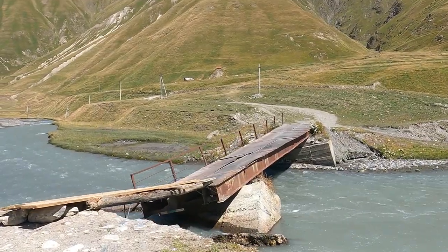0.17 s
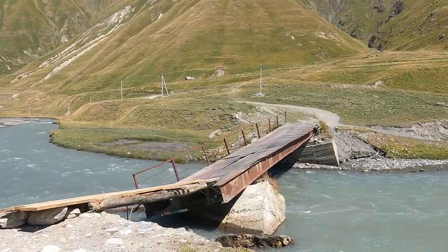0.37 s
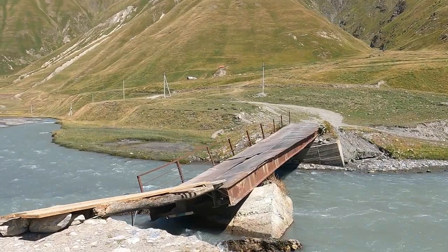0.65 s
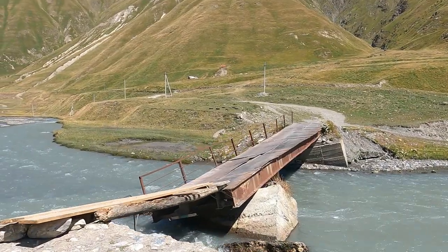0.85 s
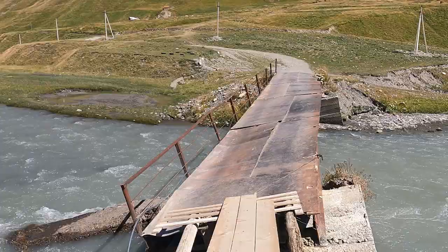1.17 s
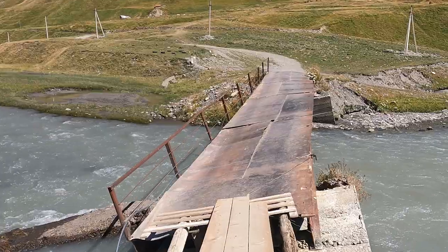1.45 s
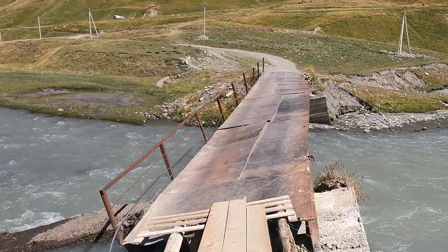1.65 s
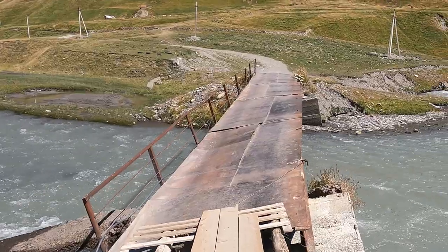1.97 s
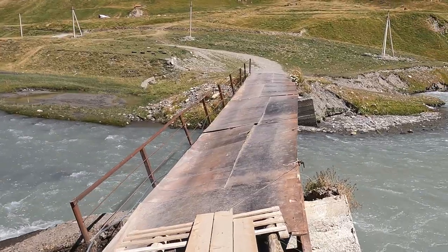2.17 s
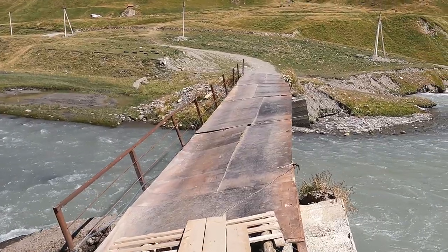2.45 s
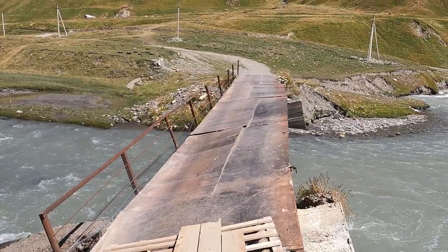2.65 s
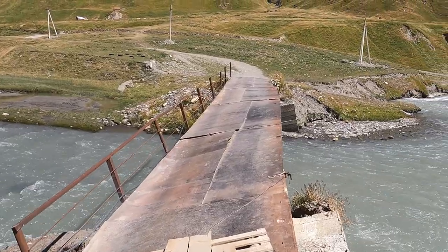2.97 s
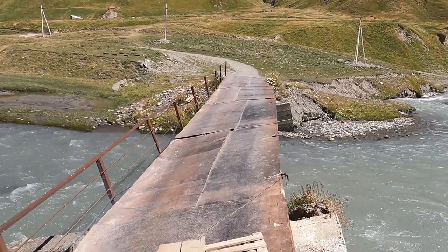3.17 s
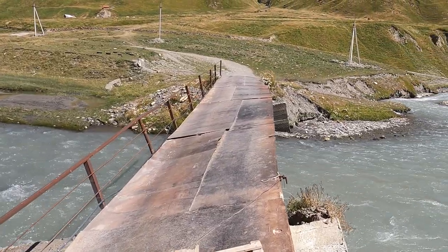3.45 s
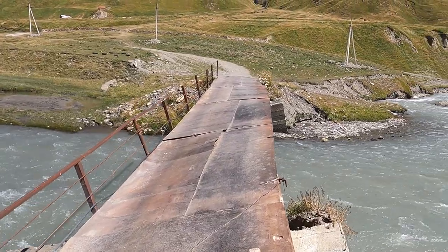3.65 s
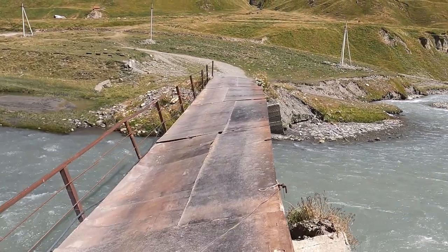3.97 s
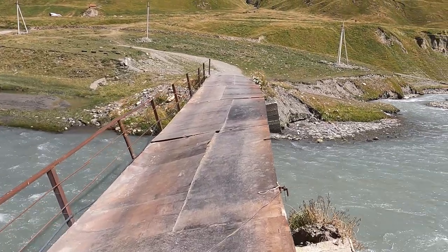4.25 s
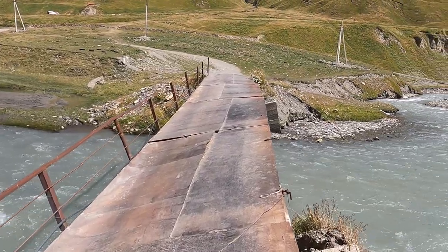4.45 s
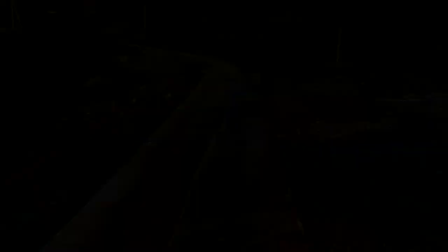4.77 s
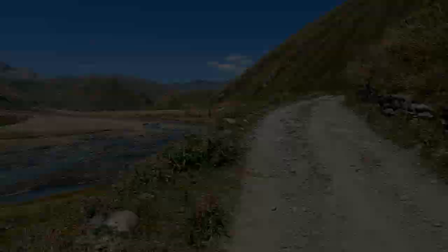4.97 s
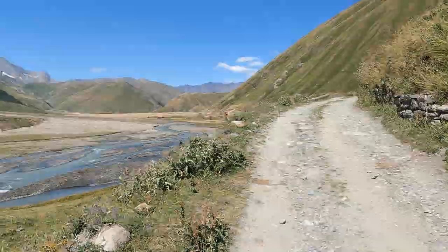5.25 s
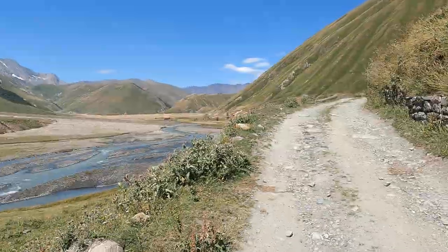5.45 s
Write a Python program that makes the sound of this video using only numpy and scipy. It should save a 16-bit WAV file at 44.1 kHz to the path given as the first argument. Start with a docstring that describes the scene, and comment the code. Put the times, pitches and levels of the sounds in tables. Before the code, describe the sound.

A mountain river rushes and gurgles, heard from the bank while wind rumbles on the microphone. After about a second it turns abruptly louder and fuller, heard from a bridge right above the water. Shoes lightly scuff grit over the steel deck, which gives one tiny squeak. The sound fades out, then returns much quieter, with a single footstep on gravel, a light breeze and the river far away.

```python
"""Mountain river: first from the bank, then, after a hard cut, from a bridge right above it.
The water is merged splashes and ringing air bubbles; at the bridge also deep roar and spray.
Wind buffets the microphone. Shoes scuff grit over the steel deck, which squeaks once.
Fade out, then fade in on a gravel road: one footstep, a light breeze, the river far away."""
import sys
import numpy as np
from scipy import signal
from scipy.fft import rfft, irfft
from scipy.io import wavfile
from scipy.ndimage import uniform_filter1d

SR = 44100
rng = np.random.default_rng(int(sys.argv[2]) if len(sys.argv) > 2 else 0)


def unload_wav(signal):
    """Save mono or channel-first audio to the path in sys.argv[1] as 16-bit WAV at rate SR, clipped to [-1, 1]."""
    wavfile.write(
        sys.argv[1],
        SR,
        np.round(np.clip(np.atleast_2d(signal).T, -1, 1) * 32767).astype(np.int16),
    )


N = 246959
TIME_S = np.arange(N) / SR
BINS_HZ = np.fft.rfftfreq(N, 1 / SR)

CUT_S = 1.205  # bank to bridge
FADE_OUT_START_S, FADE_OUT_DB_PER_S = 4.535, 175
FADE_IN_END_S, FADE_IN_DB_PER_S = 5.284, 180

# water spectra: f/Hz, level/dB
BANK_SPECTRUM = [(190, -24), (330, -3), (478, -6), (671, 0.5), (838, -4.5), (1290, -5), (1450, -7),
                 (2470, -11.5), (3030, -21.5), (3790, -18.5), (4260, -18), (6260, -39), (8170, -48),
                 (9760, -45.5), (11300, -53), (14700, -82), (22000, -120)]
BRIDGE_SPECTRUM = [(240, -27), (400, -2), (514, -4.5), (816, -0.5), (2270, -8.5), (2500, -10),
                   (2950, -20.5), (3350, -14.5), (3910, -16), (4430, -21), (6930, -33), (8550, -42.5),
                   (9700, -42.5), (11300, -50.5), (14700, -85), (22000, -120)]
FAR_SPECTRUM = [(100, -16), (180, -6.5), (310, 0), (440, -7), (600, -3), (900, -7), (1100, -3.5),
                (1450, -7.5), (1850, -7), (2500, -12.5), (3050, -25), (3900, -22.5), (6200, -35.5),
                (11500, -48), (15000, -77)]
ROAR_SPECTRUM = [(40, -16.5), (130, -8), (260, 2.5), (350, -0.5), (450, -9.5), (700, -41), (2000, -87)]
SPRAY_SPECTRUM = [(9000, -41.5), (12000, -12), (12700, 2.5), (14200, -1), (15000, -20)]
# water at the bridge, overall and white-water treble: t/s, gain/dB
BRIDGE_GAIN = [(1.2, -28), (2.15, -25.5), (3.25, -26.5), (4.0, -26.1), (4.5, -25)]
FOAM_GAIN = [(1.2, -1.5), (1.75, 2.5), (2.2, -1), (2.9, 2), (3.5, 0), (4.1, 3), (4.55, -.5)]

# wind spectra: f/Hz, level/dB
BANK_WIND_SPECTRUM = [(8, -9), (25, 0), (60, 3), (120, -1.5), (185, -7), (300, -16.5), (500, -35.5),
                      (1200, -46), (5000, -88)]
BRIDGE_WIND_SPECTRUM = [(8, -10), (25, 0), (60, 0), (120, -1.5), (180, -10.5), (300, -15), (500, -20.5),
                        (1200, -42), (5000, -85)]
ROAD_WIND_SPECTRUM = [(8, -10), (35, 1), (80, -4), (150, -17), (400, -35), (3000, -90)]
EDDY_SPECTRUM = [(40, -14.5), (130, 1), (260, -0.5), (380, -5), (600, -17.5), (2000, -61.5), (6000, -89.5)]
# breeze: t/s, level/dB
BANK_BREEZE_LEVEL = [(0, -29), (1.05, -27), (1.2, -37)]
BRIDGE_BREEZE_LEVEL = [(1.2, -21.5), (1.85, -26.5), (2.1, -31), (2.75, -28.5), (3.45, -20.5), (4.5, -22)]
ROAD_BREEZE_LEVEL = [(5.05, -46), (5.17, -35), (5.42, -50.5), (5.6, -47)]
GUST_SWELLS = [(0.068, 10.5, 0.095), (0.194, 5.5, 0.03), (0.605, 5.5, 0.15), (0.779, 9.5, 0.058),
               (1.098, 7.5, 0.023), (1.756, 8, 0.014)]  # over the breeze: t/s, rise/dB, length/s
EDDY_BURSTS = [(.565, -25.5, 0.035), (1.097, -28.5, 0.019), (1.235, -26.5, 0.057), (1.35, -32, 0.062),
               (1.5, -27.5, 0.073), (1.915, -21.5, 0.047), (2.795, -25, 0.036), (3.23, -20.5, 0.013),
               (3.65, -21, .06), (4.32, -27.5, .06), (4.385, -19, 0.071), (4.5, -23.5, 0.061)]  # eddies striking the microphone: t/s, level/dB, length/s

# shoes scuffing, gravel crushed: t/s, level/dB, length/s
SCUFF_BURSTS = [(1.925, -47, .03), (2.667, -42, 0.01), (2.715, -34.5, .01), (2.755, -38, .007),
                (2.97, -39, .006), (3.372, -36, 0.027), (4.338, -40, .025), (5.513, -60, .016),
                (5.545, -60, .035)]
CRUNCH_BURSTS = [(5.284, -45, 0.0092), (5.2945, -30, 0.0058), (5.306, -41.5, 0.025), (5.335, -39, 0.011),
                 (5.375, -40.5, 0.0056)]
# their spectra: f/Hz, level/dB
SCUFF_SPECTRUM = [(1000, -28.5), (2600, 2.5), (3800, 9), (4800, -1), (7000, -8.5), (10000, -16.5),
                  (14000, -34.5), (16000, -48)]
CRUNCH_SPECTRUM = [(120, -28), (200, 0), (380, -15), (413, -4), (524, -6), (663, -3.5), (1300, -9.5),
                   (1920, -21), (2160, -20), (4180, -30), (11300, -61), (14700, -87), (22000, -120)]
# pebbles colliding; heel, then sole landing: t/s, level/dB, f/Hz, t60/s
PEBBLE_KNOCKS = [(5.2498, -19, 2010, 0.0031), (5.2915, -27, 900, 0.009), (5.2948, -25, 1100, 0.0053),
                 (5.299, -28, 850, .008), (5.3352, -28, 1300, .006), (5.3492, -35, 1400, .005),
                 (5.3772, -22.5, 1330, 0.0051)]
SHOE_THUDS = [(5.281, -21.5, 75, .035), (5.328, -24, 42, 0.066)]
GRIT_HITS = [(2.71, -22.5, 3060), (2.713, -27, 4550), (2.7185, -36, 7000), (2.7525, -36.5, 5860),
             (2.9677, -35.5, 6000)]  # grit on steel: t/s, level/dB, f/Hz
GRIT_MODES = [(1.001, -1, .03), (1.45, -12, 0.022), (2.31, -13.5, .03), (3.04, -20, .03)]  # modes of a hit: frequency ratio, gain/dB, t60/s
DECK_SQUEAK = (2.124, .044, 2410, 2490, -28.5)  # one rub: t/s, length/s, start f/Hz, end f/Hz, level/dB
SQUEAK_HARMONICS = [(1, 0), (2, -20), (4, -35)]  # its partials: harmonic number, gain/dB


def churn(patchy_db, surge_db):
    """Countless merged splashes: noise swelling in time-frequency patches and surging as a whole."""
    cells = signal.stft(rng.standard_normal(N), nperseg=512, noverlap=384)[2]
    patches = uniform_filter1d(rng.standard_normal(cells.shape), size=9, axis=0)
    patches = unit_rms(uniform_filter1d(patches, size=14, axis=1))
    noise = signal.istft(cells * gain(patchy_db * patches), nperseg=512, noverlap=384)[1][:N]
    return unit_rms(noise * gain(surge_db * wander(rate_hz=25)))


def bubbles(rate_per_s, decay_cycles, spread_db, sizes=36):
    """Air pockets ring for a few cycles, rising in pitch as they near the surface."""
    out = np.zeros(N)
    for hz in np.geomspace(450, 10000, sizes):
        age_cycles = np.arange(int(5 * decay_cycles * SR / hz)) * hz / SR
        rise = 1 + 0.014 * age_cycles / decay_cycles
        ring = np.exp(-age_cycles / decay_cycles) * np.sin(2 * np.pi * age_cycles * rise)
        births = rng.random(N) < rate_per_s / sizes / SR
        strength = gain(spread_db * np.minimum(rng.exponential(1, N), 4))
        out += np.sqrt(hz) * unit_rms(signal.oaconvolve(births * strength, ring)[:N])
    return unit_rms(out)


def river_below(gurgle):
    """From the bridge: rush, spray and the current's roar, brighter where the water breaks white."""
    splash = churn(patchy_db=0.22, surge_db=-0.5) + 0.45 * gurgle
    rush = coloured(splash, BRIDGE_SPECTRUM) + gain(-60.5) * coloured(splash, SPRAY_SPECTRUM)
    hiss = signal.sosfiltfilt(signal.butter(2, 4500, "high", fs=SR, output="sos"), rush)
    rush += hiss * (gain(curve(FOAM_GAIN)) - 1)
    roar = gain(-5.5) * coloured(churn(patchy_db=2.0, surge_db=2.3), ROAR_SPECTRUM)
    return gain(curve(BRIDGE_GAIN)) * (rush + roar)


def river_near(gurgle):
    """From the bank: splashes and bubbles some way off, treble dulled."""
    splash = churn(patchy_db=1.0, surge_db=-0.5) + 0.38 * gurgle
    return gain(-33) * coloured(splash, BANK_SPECTRUM)


def river_far():
    """From the road: a faint wash of splashes."""
    return gain(-44.5) * coloured(churn(patchy_db=0.7, surge_db=-1.5), FAR_SPECTRUM)


def wind(breeze, spectrum, lumpy_db, buffet_db):
    """Turbulence at the microphone: lumpy rumble that follows the breeze, gusts and flutters."""
    rumble = coloured(rng.standard_normal(N) * gain(lumpy_db * wander(rate_hz=30)), spectrum)
    running_rms = np.sqrt(np.abs(uniform_filter1d(rumble ** 2, size=4400)) + 1e-9)
    gusts_db = sum(db * bell(t_s, length_s) for t_s, db, length_s in GUST_SWELLS)
    flutter_db = buffet_db * np.minimum(wander(rate_hz=14), 1)  # deep lulls, blunt tops
    return gain(curve(breeze) + gusts_db + flutter_db) * rumble / running_rms


def footstep():
    """Heel and sole thud down, crushing gravel and knocking pebbles together."""
    return bursts(CRUNCH_BURSTS, CRUNCH_SPECTRUM) + knocks(PEBBLE_KNOCKS) + knocks(SHOE_THUDS)


def grit_clinks():
    """Grit skips on steel; small grains ring higher, high modes are weak."""
    modes = []
    for t_s, db, hz in GRIT_HITS:
        for ratio, mode_db, t60_s in GRIT_MODES:
            rolloff_db = max(hz * ratio - 6500, 0) / 450
            modes.append((t_s, db + mode_db - rolloff_db, hz * ratio, t60_s))
    return knocks(modes)


def deck_squeak():
    """The deck rubs underfoot and sings briefly on a rising, unsteady pitch."""
    t_s, length_s, start_hz, end_hz, db = DECK_SQUEAK
    progress = np.clip((TIME_S - t_s) / length_s, 0, 1)
    pitch_hz = (start_hz + (end_hz - start_hz) * progress) * (1 + 0.005 * wander(rate_hz=150))
    phase_rad = 2 * np.pi * np.cumsum(pitch_hz) / SR
    swell = np.sqrt(np.abs(np.sin(np.pi * progress)))
    return swell * sum(gain(db + part_db) * np.sin(k * phase_rad) for k, part_db in SQUEAK_HARMONICS)


def knocks(rows):
    """Impacts: each rises within half a cycle, rings on one pitch and decays."""
    out = np.zeros(N)
    for t_s, db, hz, t60_s in rows:
        span = out[round(t_s * SR):][:SR // 5]
        age_s = np.arange(len(span)) / SR
        attack = 1 - np.exp(-(np.pi * hz * age_s) ** 2)
        span += attack * gain(db - 60 * age_s / t60_s) * np.sin(2 * np.pi * hz * age_s)
    return out


def bursts(rows, spectrum):
    """Short swells of coloured noise, one per row."""
    envelope = sum(gain(db) * bell(t_s, length_s) for t_s, db, length_s in rows)
    return envelope * coloured(rng.standard_normal(N), spectrum)


def coloured(x, spectrum):
    """x filtered by a spectrum, rms 1."""
    hz, db = np.transpose(spectrum)
    response_db = np.interp(np.log(BINS_HZ + 1), np.log(hz + 1), db)
    return unit_rms(irfft(rfft(x) * gain(response_db), N))


def wander(rate_hz):
    """Random drift, rolling off above rate_hz, rms 1."""
    return unit_rms(irfft(rfft(rng.standard_normal(N)) / (1 + (BINS_HZ / rate_hz) ** 2), N))


def bell(t_s, length_s):
    """Gaussian swell, peak 1 at t_s."""
    return np.exp(-2 * ((TIME_S - t_s) / length_s) ** 2)


def curve(rows):
    """Breakpoints interpolated to every sample."""
    return np.interp(TIME_S, *np.transpose(rows))


def gain(db):
    """dB to amplitude."""
    return 10 ** (np.asarray(db) / 20)


def unit_rms(x):
    """x scaled to rms 1."""
    return x / np.sqrt(np.mean(x ** 2) + 1e-20)


def scene():
    """Bank, hard cut to the bridge, fade through silence to the road."""
    gurgle = bubbles(rate_per_s=3000, decay_cycles=4.67, spread_db=2.0)
    bank = river_near(gurgle)
    bank += wind(BANK_BREEZE_LEVEL, BANK_WIND_SPECTRUM, lumpy_db=1.2, buffet_db=2.2)
    bridge = river_below(gurgle)
    bridge += wind(BRIDGE_BREEZE_LEVEL, BRIDGE_WIND_SPECTRUM, lumpy_db=1.5, buffet_db=1.3)
    bridge += grit_clinks() + deck_squeak()
    riverside = np.where(TIME_S < CUT_S, bank, bridge) + bursts(EDDY_BURSTS, EDDY_SPECTRUM)
    road = river_far() + footstep()
    road += wind(ROAD_BREEZE_LEVEL, ROAD_WIND_SPECTRUM, lumpy_db=1.5, buffet_db=1.5)
    fade_out = gain(-FADE_OUT_DB_PER_S * np.maximum(TIME_S - FADE_OUT_START_S, 0))
    fade_in = gain(-FADE_IN_DB_PER_S * np.maximum(FADE_IN_END_S - TIME_S, 0))
    return (riverside * fade_out + road * fade_in + bursts(SCUFF_BURSTS, SCUFF_SPECTRUM))[None]


def record(dry):
    """Microphone treble dip, then a steep low-pass."""
    dip_hz, width_hz, dip_db, cutoff_hz = 11950, 420, -9, 14900
    dip = gain(dip_db * np.exp(-2 * ((BINS_HZ - dip_hz) / width_hz) ** 2))
    heard = irfft(rfft(dry) * dip, N)
    lowpass = signal.firwin(511, cutoff_hz, window=("kaiser", 9), fs=SR)
    return signal.oaconvolve(heard, lowpass[None], "same")


dry = scene()
out = record(dry)
unload_wav(out)
```